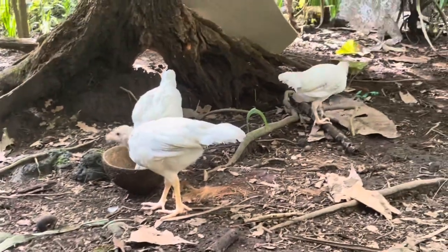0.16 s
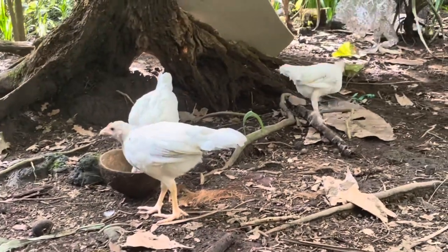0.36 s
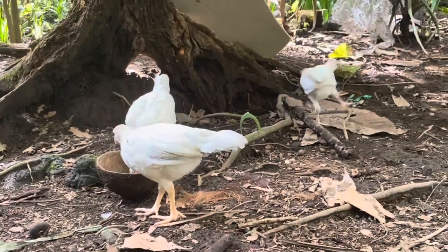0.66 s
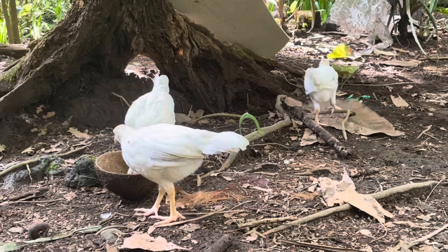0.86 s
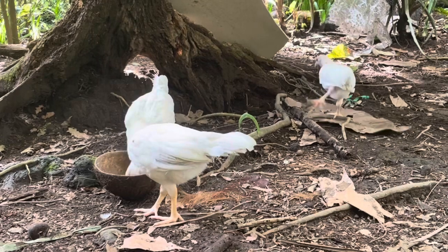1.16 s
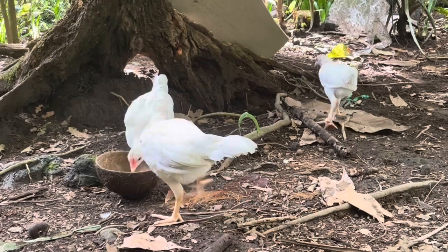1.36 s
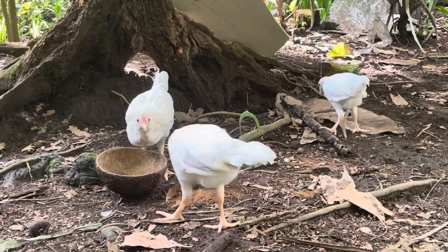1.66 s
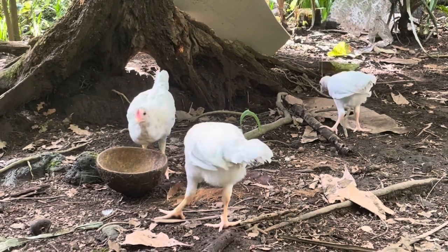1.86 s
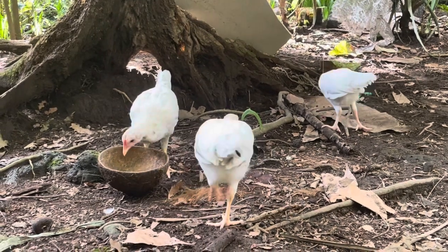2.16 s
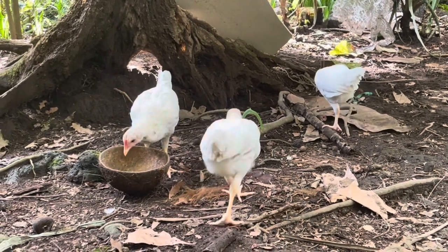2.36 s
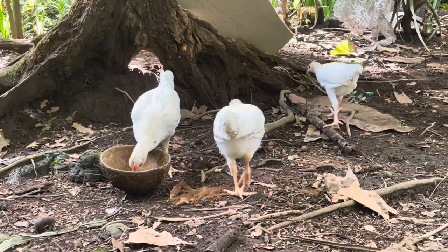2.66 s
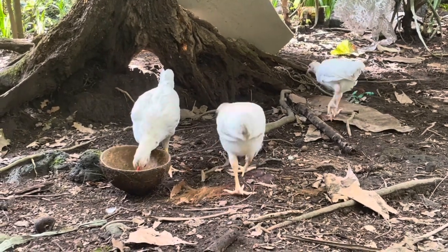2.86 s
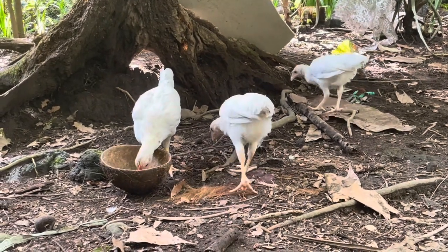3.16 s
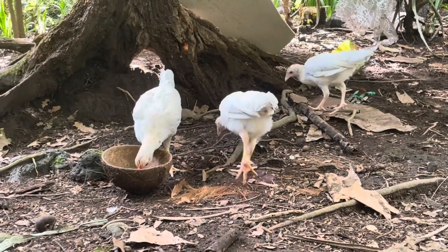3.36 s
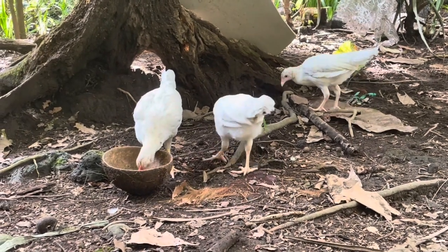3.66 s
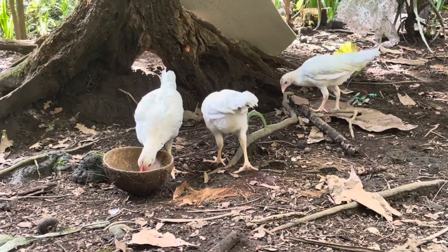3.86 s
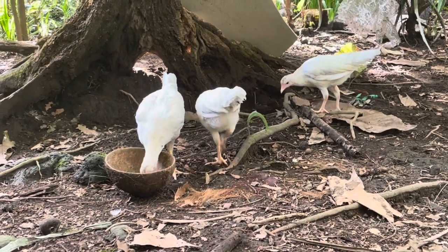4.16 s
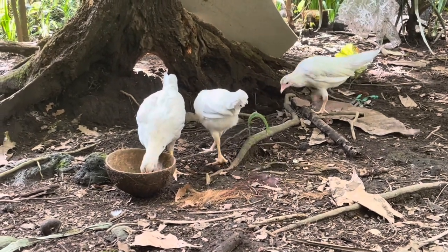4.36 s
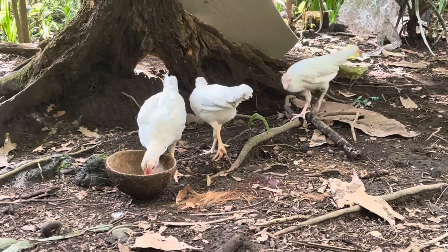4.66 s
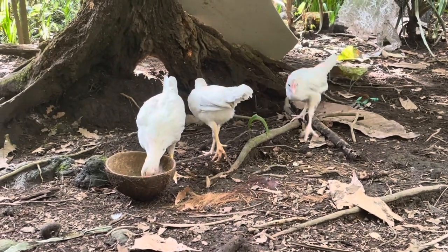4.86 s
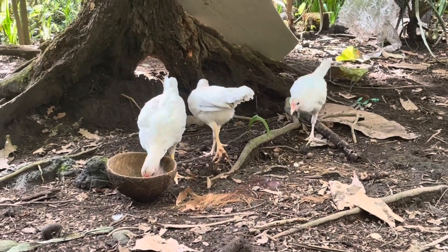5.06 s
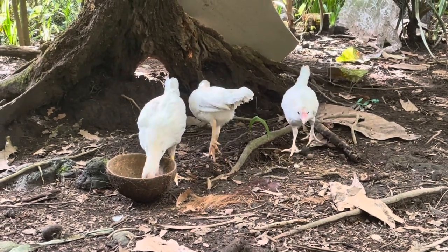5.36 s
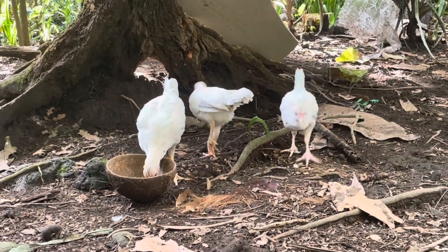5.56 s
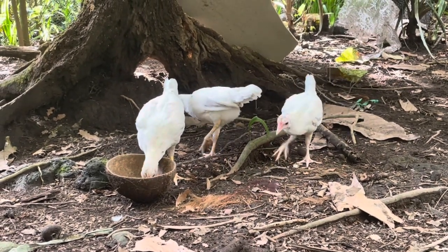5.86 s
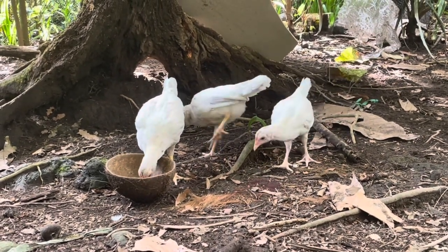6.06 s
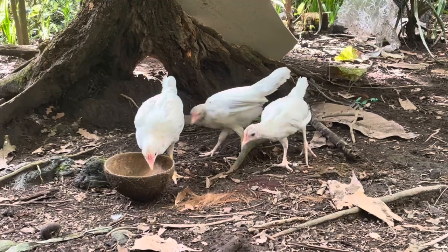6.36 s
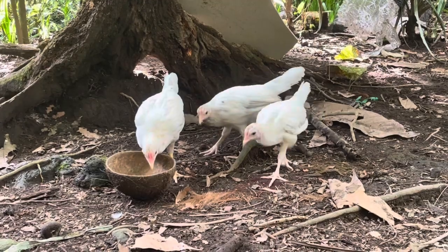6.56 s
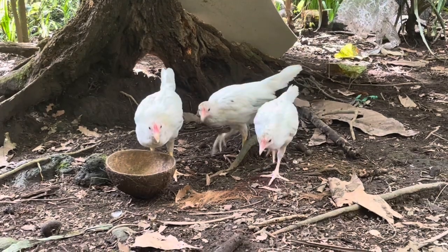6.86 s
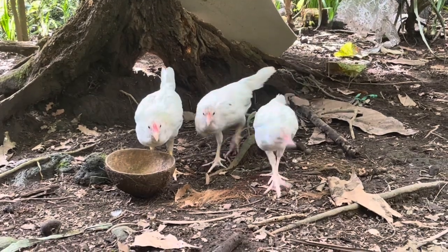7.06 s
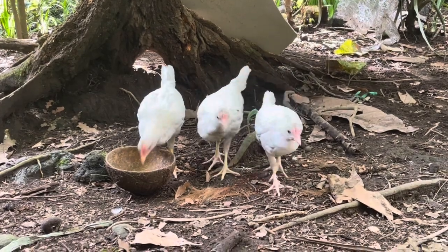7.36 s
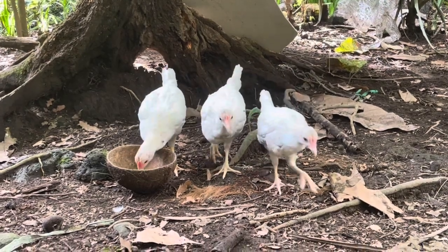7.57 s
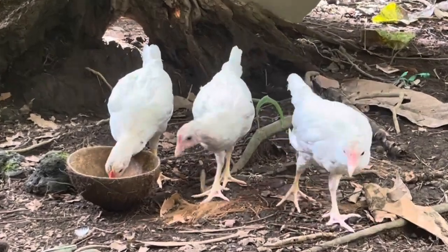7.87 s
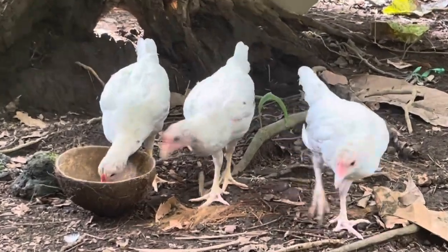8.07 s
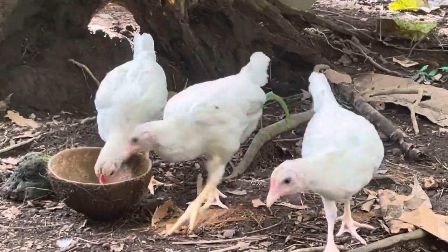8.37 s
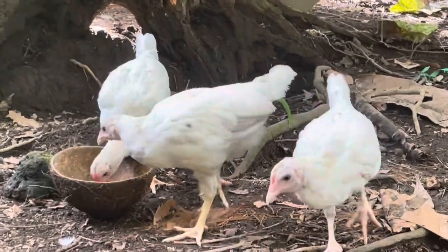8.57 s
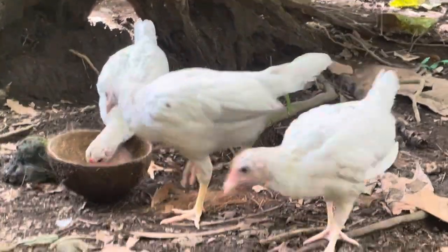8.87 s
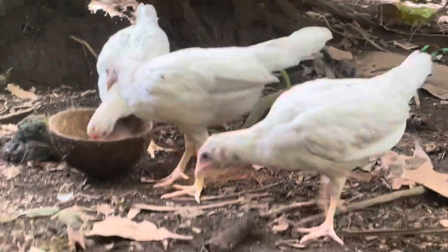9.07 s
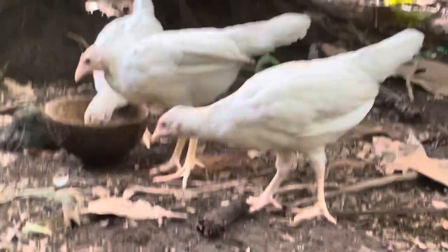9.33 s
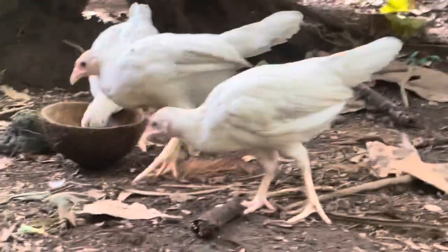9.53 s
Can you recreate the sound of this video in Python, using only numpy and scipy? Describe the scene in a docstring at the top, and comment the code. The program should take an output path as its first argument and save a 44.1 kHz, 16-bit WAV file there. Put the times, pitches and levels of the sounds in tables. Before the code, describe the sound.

A nearby stereo microphone in a leafy yard picks up busy leaf rustling and a sharp bowl knock at first, then sparser scratching, a loud crackle at seven seconds and a cluster of bowl pecks near nine. Behind these, a dog barks with slight echo, roosters crow hoarsely three times, a bird whistles, a young fowl peeps briefly, and a low hum and breeze rumble underneath.

```python
"""A breeze rumbles on the microphone and a motor hums as a far dog barks in steady runs of rough pulses.
Young fowl scratch dry leaves, heard as crackling noise bursts, and peck a hollow bowl, heard as short rings.
A small bird whistles and trills in gliding tones. Roosters further off give hoarse, drawn-out crows,
built from partials that waver and break up; a young bird adds a few short peeps."""
import sys
import numpy as np
from scipy import signal
from scipy.fft import rfft, irfft, next_fast_len
from scipy.io import wavfile
from scipy.ndimage import uniform_filter1d

SR = 44100
rng = np.random.default_rng(int(sys.argv[2]) if len(sys.argv) > 2 else 0)


def transcribe(signal):
    """Save signal, clipped to [-1, 1], as a 16-bit WAV file at the path in sys.argv[1]."""
    frames = np.atleast_2d(signal).T
    limited = np.clip(frames, -1, 1)
    pcm = np.round(limited * 32767).astype(np.int16)
    wavfile.write(sys.argv[1], SR, pcm)


def decibels_to_gain(level_db):
    """Convert a level in decibels to a linear amplitude gain (20 dB per decade)."""
    exponent = np.asarray(level_db, float) / 20
    return 10 ** exponent


N = 427769
T = np.arange(N) / SR   # time axis (s)


def rms_one(x):
    """Scales a signal to an rms of 1."""
    return x / np.sqrt(np.mean(x ** 2) + 1e-20)


def coloured(x, points):
    """Equalises a sound through (hz, gain_db) points, joined over log frequency."""
    size = next_fast_len(x.shape[-1])
    hz, gain_db = np.transpose(points)
    log_hz = np.log(np.fft.rfftfreq(size, 1 / SR) + 1)
    gain = decibels_to_gain(np.interp(log_hz, np.log(hz), gain_db))
    return irfft(rfft(x, size) * gain, size)[..., :x.shape[-1]]


def wobble(rate_hz, size):
    """Smooth chance with nothing much faster than its rate, spread 1."""
    lowpass = signal.butter(3, rate_hz, fs=SR, output="sos")
    settled = signal.sosfilt(lowpass, rng.standard_normal(size + SR))[SR:]
    return rms_one(settled)


def bump(s, half_s):
    """A smooth swell, 1 on top."""
    return np.exp(-((T - s) / half_s) ** 2)


def resonate(x, hz, width_hz):
    """Two-pole resonance, gain 1 on top."""
    r = np.exp(-np.pi * width_hz / SR)
    feedback = [1, -2 * r * np.cos(2 * np.pi * hz / SR), r * r]
    return signal.lfilter([(1 - r * r) / 2, 0, (r * r - 1) / 2], feedback, x)


def partial(phase, db, hoarse, flutter_hz):
    """A tone whose hoarse share wanders in strength and phase, so that it breaks into short bursts."""
    hoarse = np.clip(hoarse, 0, 1)
    wander = (wobble(flutter_hz, phase.size) + 1j * wobble(flutter_hz, phase.size)) / np.sqrt(2)
    motion = np.sqrt(1 - hoarse) + np.sqrt(hoarse) * wander
    return np.sqrt(2) * decibels_to_gain(db) * np.real(motion * np.exp(1j * phase))


def unroll(rows, fade_s=0.01):
    """Where a call lies, its columns sample by sample, and its soft ends."""
    s, *columns = np.transpose(rows)
    span = slice(int(s[0] * SR), int(s[-1] * SR))
    t = T[span]
    ends = np.clip(np.minimum(t - s[0], s[-1] - t) / fade_s, 0, 1)
    return span, [np.interp(t, s, column) for column in columns], ends


def echoes(x, t60_s, onset_s, alike):
    """Walls and trees return a dying wash, partly different on each side."""
    t = T[:SR]
    noise = rng.standard_normal((3, t.size))
    decay = decibels_to_gain(-60 * t / t60_s) * (1 - np.exp(-t / onset_s))
    wash = (alike * noise[0] + noise[1:]) * decay
    return signal.fftconvolve(x[None], wash, axes=1)[:, :x.size]


def wide_noise(points):
    """Coloured noise of rms 1, independent in mid and side."""
    return rms_one(coloured(rng.standard_normal((2, N)), points))


def gust_swells():
    """Each gust swells and sinks as a smooth bump."""
    # gusts: top_s (when the swell peaks), level_db, half_width_s
    gust_rows = [(1.84, -53, 0.031), (3.76, -51, 0.079), (7.92, -55, 0.06), (8.24, -43, 0.021),
                 (9.05, -41.5, 0.15), (9.54, -40.5, 0.15)]
    return sum(decibels_to_gain(db) * bump(top_s, half_s) for top_s, db, half_s in gust_rows)


def breeze(gusts):
    """Lumpy low wind noise on the microphone, blown up by the gusts."""
    # wind colour: hz, gain_db
    wind_colour = [(22, -54), (32, -11), (42, -13.5), (55, 9.5), (75, 7), (92, 8.5), (110, -31),
                   (200, -110)]
    blow = decibels_to_gain(-52.5 + 2 * wobble(6.8, N)) + gusts
    wind = wide_noise(wind_colour)
    # evened out, so that the blow and not chance sets the swell
    wind /= np.sqrt(uniform_filter1d(wind ** 2, size=SR // 8) + 0.25)
    return blow * wind


def drone(gusts):
    """Far traffic as low noise that swells once; the gusts add noise of the same colour."""
    # drone colour: hz, gain_db
    drone_colour = [(70, -20.5), (100, -2), (140, -1.5), (175, -2.5), (200, -13.5), (276, -14.5),
                    (450, -24.5), (900, -100)]
    drone_db = -57.5 + 4.3 * bump(7.77, half_s=0.86)
    return decibels_to_gain(-16.5) * gusts * wide_noise(drone_colour) + decibels_to_gain(drone_db) * wide_noise(drone_colour)


def yard_murmur():
    """The murmur of the yard, noise with a slightly unsteady level."""
    # murmur colour: hz, gain_db
    yard_colour = [(180, -20), (300, -12), (407, -7), (599, 2.5), (1030, -3), (1430, -6), (2200, -7.5),
                   (3500, -18), (7000, -77)]
    return decibels_to_gain(-68.5 + 0.86 * wobble(22.0, N)) * wide_noise(yard_colour)


def motor_hum():
    """A steady low tone and its wavering octave, each with its own slow level."""
    # motor: time_s, hum_db, octave_db
    hum_levels = [(0, -60.5, -64.5), (.7, -71, -64.5), (2.7, -67, -68.5), (3.3, -53.5, -100),
                  (4.2, -48, -69), (6.8, -53, -67), (7.7, -47.5, -87), (9.5, -50.5, -62), (9.7, -67, -83)]
    s, hum_db, octave_db = np.transpose(hum_levels)
    phase = 2 * np.pi * 104 * T   # 104 Hz
    hum = partial(phase, np.interp(T, s, hum_db), 0.063, flutter_hz=4.55)
    return hum + partial(2 * phase, np.interp(T, s, octave_db), 0.99, flutter_hz=12.1)


def air():
    """Breeze, drone and murmur spread over the stereo width, the hum in the centre."""
    # width of the air: hz, side_gain_db
    air_width = [(40, -48), (150, -24.5), (380, -17), (950, -17), (2380, -10.5)]
    gusts = gust_swells()
    mid, side = breeze(gusts) + drone(gusts) + yard_murmur()
    mid = mid + motor_hum()
    side = coloured(side, air_width)
    return np.array([mid + side, mid - side])


def litter():
    """Dry leaves stir as a flickering hiss with tiny crackles, more of them as the stirring grows."""
    # stirring: time_s, hiss_db
    stirring = [(0, -70.5), (.6, -64.5), (.75, -71), (1.1, -63), (2.0, -72.5), (6.1, -73.5), (6.28, -65.5),
                (6.5, -75), (7.1, -71.5), (8.9, -68.5), (9.3, -72), (9.7, -70)]
    # hiss colour: hz, gain_db
    hiss_colour = [(1500, -0.5), (3000, 1.5), (5000, -1.5), (6900, -5), (9000, -10), (10700, 2),
                   (13000, -16), (14500, -3.5), (16000, -9)]
    s, db = np.transpose(stirring)
    draw = rng.random((2, N))
    activity_db = 5 * wobble(4, N) + np.interp(T, s, db - np.median(db))
    falls = draw[0] < 25 * decibels_to_gain(activity_db) / SR   # 25 a second at 0 dB activity
    crackles = falls * 9 * np.minimum((1 - draw[1]) ** -.5, 2.5)
    hiss = rms_one(coloured(rng.standard_normal(N) + crackles, hiss_colour))
    return decibels_to_gain(np.interp(T, s, db) + 1.4 * wobble(25.0, N)) * hiss


def barks():
    """Rough pulses on an arched pitch pass a throat shaped anew each time; walls and trees add a wash."""
    # barks: start_s, level_db, chest_db, top_db (balance of the low and high resonances)
    bark_rows = [(-0.06, -61, -2, -4), (1.025, -61, 0.5, 3), (1.53, -56.5, -3.5, -3),
                 (2.53, -58.5, -2.5, -3), (2.965, -58, -3, 0.5), (3.435, -60, -3, -1),
                 (3.908, -59, -4.5, -4), (4.357, -57, -6.5, -4.5), (5.47, -68, -9, -1),
                 (5.66, -59.5, -3.5, 0), (6.11, -55.5, -4.5, -6), (6.59, -64, -1, -9),
                 (7.07, -57.5, -4.5, -1.5), (9.3, -62.5, -2, -0.5), (9.65, -66, 7.5, -11)]
    # throat resonances before each bark's shaping: hz, width_hz, gain_db
    throat = [(517, 81, -1.5), (704, 84, 12), (1155, 235, 5), (1550, 140, -23), (1891, 150, 3),
              (3020, 370, -16)]
    lead = SR // 10   # room for the bark already under way at the start
    voice, t = np.zeros(N + lead), T[:int(.145 * SR)]
    arch = np.sin(np.pi * t / t[-1])
    for s, db, chest_db, top_db in bark_rows:
        centre_hz = 533 * (1 + .015 * rng.standard_normal())
        hz = centre_hz * (.85 + .2 * arch) * (1 + .04 * wobble(150, t.size))
        phase = np.cumsum(hz) / SR
        pulses = rms_one(np.diff(phase % 1, prepend=0)) + 1.17 * rng.standard_normal(t.size)
        pulses = np.pad(decibels_to_gain(db) * arch ** .4 * pulses, (0, lead))
        # as the jaw drops, all resonances but the second swell in
        opens = np.clip(T[:pulses.size] / 0.033, 0, 1) ** 2
        chest, top = decibels_to_gain(chest_db), opens * decibels_to_gain(top_db)
        parts = [opens * chest, chest, opens, opens, top, top]
        shape = rng.standard_normal((len(throat), 2)) * [.025, 2]   # shift as a share, gain in dB
        bark = np.zeros(pulses.size)
        for k, ((hz, width_hz, gain_db), (shift, more_db)) in enumerate(zip(throat, shape)):
            ring_hz = hz * (1 + shift)
            ring = resonate(resonate(parts[k] * pulses, ring_hz, width_hz), ring_hz, 2 * width_hz)
            bark += decibels_to_gain(gain_db + more_db) * (-1) ** k * ring
        at = int(s * SR) + lead
        voice[at:][:bark.size] += bark[:voice.size - at]
    wash = echoes(voice, t60_s=0.92, onset_s=0.0048, alike=3.6)
    return (decibels_to_gain(14.5) * voice + decibels_to_gain(-32.5) * wash)[:, lead:]


def rustles():
    """Feet and beaks in dry leaves: a snap, then a clump of crackles with its own tonal balance."""
    # rustles: start_s, level_db, decay_s (time to fall 30 dB), low_db, top_db
    rustle_rows = [(0.037, -45.5, 0.16, -8, -5), (0.168, -42, 0.059, 8.5, -4), (0.274, -31, 0.014, -4, -25),
                   (0.514, -38.5, 0.057, 6, -13), (0.578, -42, 0.28, -26, -12),
                   (0.816, -36.5, 0.088, -3, -9), (0.841, -40.5, .1, 3.5, -12),
                   (1.008, -51, 0.045, 18.5, 12.5), (1.116, -40, 0.071, 7, 2),
                   (1.1393, -44, 0.071, 16.5, -18), (1.287, -47, 0.078, 13.5, -8),
                   (1.306, -28, 0.063, 3, -7), (1.328, -32, 0.037, 1, -10), (1.38, -42.5, 0.089, -15, -4),
                   (1.457, -46, 0.14, 12.5, -0.5), (1.576, -48.5, 0.07, 21, -10),
                   (1.649, -41.5, 0.081, 15, 0), (2.18, -43, 0.043, 2, -14), (2.576, -57.5, 0.06, -9, 11),
                   (3.092, -45.5, 0.15, 6, -27), (3.633, -48, 0.089, 16, -13), (4.317, -41.5, 0.098, 3, -6),
                   (4.89, -51.5, 0.29, -27, -7), (6.168, -41, 0.02, -6, 0.5), (6.225, -34, 0.056, -11, 1.5),
                   (6.647, -44, 0.21, 9, -19), (7.003, -25, 0.063, -3, -10), (7.015, -42, 0.037, -7, 4),
                   (6.557, -47.5, .03, -3, -11), (9.31, -49, .03, 11, -8), (8.848, -39.5, 0.041, -6, -16),
                   (9.2645, -59.5, 0.11, 21, 15)]
    out, t = np.zeros(N), T[:int(.15 * SR)]
    for s, db, decay_s, low_db, top_db in rustle_rows:
        draw = rng.random((3, t.size))
        heights = np.minimum((1 - draw[2]) ** -.4, 3.0)
        grains = (draw[0] < 3500 / SR) * np.sign(draw[1] - .5) * heights   # 3500 a second
        burst = (0.16 * grains + 0.31 * (draw[1] - .5)) * decibels_to_gain(-30 * t / np.clip(decay_s, .003, .3))
        burst *= 1 - np.exp(-t / 0.0026)
        burst *= decibels_to_gain(1.5 * wobble(120, t.size))
        burst[0] += 0.3   # the snap
        low = decibels_to_gain(low_db) * resonate(burst, 850, 1560)
        middle = resonate(burst, 3200, 2830)
        top = decibels_to_gain(top_db) * resonate(burst, 10300, 6000)
        at = int(s * SR)
        out[at:][:t.size] += (2.66 * decibels_to_gain(db) * (low + middle + top))[:N - at]
    return out


def knocks():
    """Beaks tap a hollow bowl: its shell rings for a few cycles, a little off pitch, under a dull tick."""
    # taps: start_s, level_db, place (0 belly to 1 rim)
    taps = [(.411, -43.5, 0.097), (.516, -51, 0.2), (1.01, -53, 0.1), (1.143, -28, 0.97), (1.147, -39, .99),
            (4.327, -41, 0.89), (8.783, -38.5, 0.32), (8.864, -44, 0.42), (8.909, -36.5, 0.03),
            (8.944, -45, 0.03), (8.963, -34, 0.05), (8.981, -34.5, 0.27), (9.24, -43, 0.05),
            (9.415, -41, 0.66)]
    # shell modes before detuning: hz, belly_db, rim_db, t60_s
    bowl_modes = [(800, 0.5, -43, 0.029), (1230, -14, -23, 0.018), (1550, -30, -1.5, 0.0064),
                  (2490, -39, 3, 0.0016)]
    out, t = np.zeros(N), T[:int(.04 * SR)]
    for s, db, place in taps:
        detune = 1 + 0.03 * rng.standard_normal()
        shell = np.zeros(t.size)
        for hz, belly_db, rim_db, t60_s in bowl_modes:
            level = decibels_to_gain(belly_db) + (decibels_to_gain(rim_db) - decibels_to_gain(belly_db)) * np.clip(place, 0, 1)
            shell += level * decibels_to_gain(-60 * t / t60_s) * np.sin(2 * np.pi * hz * detune * t)
        tick = resonate(rng.standard_normal(t.size) * decibels_to_gain(-60 * t / 0.0017), 1600, 1500)
        out[int(s * SR):][:t.size] += decibels_to_gain(db) * (shell + 1.2 * tick)
    return out


def gliding_tones(calls, hoarse, flutter_hz):
    """Sings one tone for each call, a list of (time_s, pitch_hz, level_db) points."""
    out = np.zeros(N)
    for rows in calls:
        span, (hz, db), ends = unroll(rows, fade_s=0.0051)
        out[span] += ends * partial(2 * np.pi * np.cumsum(hz) / SR, db, hoarse, flutter_hz)
    return out


def notes(rows):
    """Each note swells in, glides evenly and fades."""
    swell, fade_db = 0.43, 6.5   # swell as a share of the length
    calls = []
    for s, length_s, first_hz, last_hz, db in rows:
        top_hz = first_hz + (last_hz - first_hz) * swell
        calls.append([(s, first_hz, db - 3.0), (s + swell * length_s, top_hz, db),
                      (s + length_s, last_hz, db - fade_db)])
    return calls


def flutters():
    """The small bird's trills: tones that break up fast."""
    # trills: start_s, length_s, first_hz, last_hz, level_db
    trills = [(.72, 0.094, 5320, 5400, -76), (2.97, 0.132, 5330, 5180, -78.5)]
    return gliding_tones(notes(trills), hoarse=1, flutter_hz=170)


def whistles():
    """The small bird's whistle: a quick slide up, then a nearly held top that dies away."""
    # whistles: start_s, length_s, level_db, top_hz
    whistle_rows = [(0.91, 0.115, -64.5, 5260), (1.75, 0.14, -76, 5070), (3.132, 0.24, -65.5, 5110),
                    (5.703, .17, -69.5, 5250)]
    rise_s, swell_db, fade_db = 0.065, 14, 20
    calls = [[(s, .8 * hz, db - swell_db), (s + rise_s, hz, db), (s + length_s, .987 * hz, db - fade_db)]
             for s, length_s, db, hz in whistle_rows]
    return gliding_tones(calls, hoarse=0.65, flutter_hz=90)


def far_notes():
    """Faint far notes: single unsteady tones."""
    # notes: start_s, length_s, first_hz, last_hz, level_db
    faint_rows = [(1.46, 0.16, 1690, 1680, -61), (1.62, 0.25, 2870, 2820, -69.5),
                  (2.73, 0.24, 2835, 2817, -76), (2.79, 0.27, 4050, 3890, -84),
                  (3.24, 0.22, 1754, 1665, -73), (5.02, 0.32, 1172, 1240, -69),
                  (7.578, 0.038, 670, 700, -61.5), (3.49, 0.21, 1645, 1646, -71),
                  (7.52, 0.18, 6660, 7100, -76)]
    return gliding_tones(notes(faint_rows), hoarse=0.61, flutter_hz=46.0)


def crows():
    """Effort lifts all partials; throat ring feeds the second and drains those above; rasp breaks up the
    high ones most, a growl sets tones between them and breath fills the gaps."""
    # voice, one list per crow: time_s, pitch_hz, hoarseness (0-1), rasp (0-1)
    crow_voices = [
        [(1.6, 770, .95, .5), (1.76, 800, .95, .6), (1.85, 890, .95, .6), (2.05, 915, .95, .4),
         (2.3, 922, .8, .2), (2.47, 905, .95, .5), (2.57, 835, .95, .6), (2.7, 780, .9, .5), (2.95, 680, 1, .7)],
        [(5.3, 825, .8, .15), (5.58, 840, .9, .2), (5.73, 885, .9, .25), (6.0, 855, .6, .06),
         (6.2, 830, .7, .1), (6.49, 815, .7, .1), (6.52, 823, .06, 0), (6.8, 818, .08, 0), (6.98, 808, .2, 0),
         (7.05, 803, .6, .05), (7.3, 795, .9, .2)],
        [(7.63, 945, .9, .3), (7.69, 985, .9, .6), (7.88, 960, .95, .5), (7.94, 1025, .95, .45),
         (8.1, 995, .9, .3), (8.25, 980, .85, .3), (8.42, 955, .95, .75), (8.53, 945, .85, .5),
         (8.63, 948, .6, .04), (8.8, 940, .55, .01), (9.0, 875, .85, .1), (9.3, 860, 1, .3)],
    ]
    # effort, one list per crow: time_s, fundamental_db, ring_db on the 2nd partial
    crow_efforts = [
        [(1.6, -58, -3), (1.86, -54.5, -0.5), (2.33, -50.5, 1), (2.74, -62.5, 3), (2.95, -63.5, -5)],
        [(5.3, -60, 0), (5.38, -59.5, -1), (5.47, -53.5, -5.5), (5.8, -58.5, 7), (6.05, -58, -0.5),
         (6.3, -69, 13.5), (6.49, -72.5, 13), (6.53, -70, 22), (6.75, -64.5, 17), (6.98, -64, 10),
         (7.14, -66, 9.5), (7.3, -74, 4)],
        [(7.63, -81, 5), (7.66, -54.5, 2), (7.72, -51, -1.5), (7.88, -58.5, -2), (7.95, -52.5, 6),
         (8.12, -52.5, 9.5), (8.35, -49, 9.5), (8.44, -54.5, 15.5), (8.485, -54.5, 7), (8.52, -53.5, 16.5),
         (8.66, -56, 17), (8.76, -55.5, 13), (8.98, -57, 14.5), (9.1, -64, 7), (9.3, -73.5, 6.5)],
    ]
    # strain, one list per crow: time_s, bite_db on the 3rd and higher partials, growl_depth (0-1)
    crow_strains = [
        [(1.6, 9, 0.1), (1.9, -3, 0.02), (2.25, 5, 0), (2.5, -5, 0.19), (2.95, -6, 0.27)],
        [(5.3, -5.5, 0.05), (5.8, 7.5, 0), (6.2, 0, 0.2), (6.5, 12, 0.11), (6.9, 0, 0.01), (7.3, 7, 0.35)],
        [(7.63, 4, 0), (7.8, 4, 0.2), (7.92, 0, 0.17), (8.15, 2, 0), (8.3, 3.5, 0.07), (8.45, 7, 0.03),
         (8.62, 6.5, 0), (8.85, 7.5, 0), (9.0, 7, 0), (9.3, -7, 0.15)],
    ]
    # air forced past the voice, one list per crow: time_s, level_db
    crow_breaths = [
        [(1.6, -69), (1.9, -62), (2.45, -59), (2.95, -68)],
        [(5.3, -65), (5.55, -61), (5.8, -71), (6.5, -62), (7.3, -81)],
        [(7.63, -70), (7.78, -56), (7.88, -65), (8.0, -59), (8.2, -63), (8.42, -54.5), (8.56, -55),
         (8.72, -69.5), (9.3, -79)],
    ]
    # breath colour: hz, gain_db
    breath_colour = [(600, -15), (1200, 5.5), (1600, 9), (2300, 3.5), (2900, -6.5), (3600, -12),
                     (4500, -10.5), (5500, -8), (7000, -22)]
    # 3rd and higher partials against the fundamental before bite and ring, one row per crow: level_db
    overtones = [
        [-17.5, -20.5, -21, -33, -23, -45, -33, -30, -34],
        [-19.5, -12, -48, -40, -25, -31],
        [-7, -11.5, -16.5, -14.5, -26, -35, -27, -26, -36, -36, -36, -32],
    ]
    # loss of the 3rd, 4th and higher partials per dB of ring: drain (dB per dB)
    ring_drains = [0.87, 0.65, 0.033]
    # growl rate, one per crow: share of the pitch
    growl_shares = [.5, .5, .3]
    # mouth and beak colour the high partials: hz, gain_db
    beak_colour = [(3300, 0), (3800, -5.5), (4300, 9), (4700, -4.5), (5200, 2.5), (5700, -6.5), (6100, -6),
                   (6900, 1), (7500, -4.5)]
    # stereo place, one per crow: left_minus_right_db
    crow_pans = [0.4, 0.5, 2]
    out = np.zeros((2, N))
    for voice, effort, strain, breath, overtones_db, share, pan_db in zip(
            crow_voices, crow_efforts, crow_strains, crow_breaths, overtones, growl_shares, crow_pans):
        span, (effort_db, ring_db), ends = unroll(effort)
        _, (hz, hoarse, rasp), _ = unroll(voice)
        _, (bite_db, growl_depth), _ = unroll(strain)
        _, (breath_db,), _ = unroll(breath)
        size = hz.size
        pan = decibels_to_gain([[pan_db / 2], [-pan_db / 2]])

        phase = 2 * np.pi * np.cumsum(hz * (1 + .007 * hoarse * wobble(14, size))) / SR
        effort_db = effort_db + 1.2 * hoarse * wobble(12, size)
        growl = 1 + np.clip(growl_depth, 0, 1) * partial(share * phase, 0, .8, flutter_hz=40)
        gasp = decibels_to_gain(breath_db + 1.96 * wobble(23, size))
        out[:, span] += ends * gasp * rms_one(coloured(rng.standard_normal(size), breath_colour)) * pan

        drains = np.pad(ring_drains, (0, len(overtones_db)), "edge")
        levels = [effort_db, effort_db + ring_db]
        levels += [effort_db + bite_db + db - drain * ring_db for db, drain in zip(overtones_db, drains)]
        for k, db in enumerate(levels, 1):
            db = db + np.interp(k * hz, *np.transpose(beak_colour)) + (k > 2) * 2.2 * wobble(5, size)
            broken = np.clip(rasp * (.3 + .17 * k), 0, .9)
            tone = np.sqrt(1 - broken) * partial(k * phase, db, hoarse, flutter_hz=19 + 10 * k)
            tone += np.sqrt(broken) * partial(k * phase, db, 1, flutter_hz=100 + 35 * k)
            # the low tone spreads round and arrives centred
            out[:, span] += ends * growl * tone * pan ** (k > 1)
    return out + decibels_to_gain(-41.5) * echoes(out.mean(0), t60_s=.45, onset_s=.01, alike=0)


def peeps():
    """A young bird's short gliding notes of three partials."""
    # peeps: start_s, length_s, first_hz, last_hz, level_db, second_db, third_db
    peep_rows = [(5.234, 0.041, 1440, 1326, -50.5, -60, -65), (7.436, 0.02, 1160, 1210, -68, -49.5, -60),
                 (7.444, 0.037, 1550, 1080, -50, -50.5, -60.5)]
    out = np.zeros(N)
    for s, length_s, first_hz, last_hz, *levels in peep_rows:
        u = np.linspace(0, 1, int(length_s * SR))
        phase = 2 * np.pi * np.cumsum(first_hz + (last_hz - first_hz) * u) / SR
        voice = sum(partial(k * phase, db, 0.41, flutter_hz=80) for k, db in enumerate(levels, 1))
        out[int(s * SR):][:u.size] += np.sin(np.pi * u) * voice
    return out


def scene():
    """All sources together; trills, whistles and far notes are blurred by echoes among the trees."""
    near = litter() + rustles() + knocks() + peeps()
    far = flutters() + whistles() + far_notes()
    far_wash = decibels_to_gain(-36.0) * echoes(far, t60_s=0.58, onset_s=0.0082, alike=1.86)
    return air() + barks() + near + 1.8 * far + far_wash + crows()


def roll_off(x):
    """The treble ends steeply here."""
    return signal.sosfilt(signal.butter(12, 15730, fs=SR, output="sos"), x)


def record(dry):
    """The scene's width survives below 2.5 kHz; above, the phase between two microphone ports sets it."""
    # the ports fall out of phase near 8 and 14 kHz; what they share: hz, gain_db
    in_phase = [(7300, 1), (7700, -7.5), (8200, -24), (8750, -10), (9300, -2.5), (13300, -3), (14100, -15),
                (15700, -21)]
    # what they oppose: hz, gain_db
    opposed = [(2500, -17), (5800, -33.5), (6500, -6), (7500, 1.5), (9000, 2), (10200, -5), (11000, -20),
               (12600, -25), (13300, 1), (14500, -6), (15700, -20)]
    mid, side = (dry[0] + dry[1]) / 2, (dry[0] - dry[1]) / 2
    quarter_turned = np.imag(signal.hilbert(mid, next_fast_len(N)))[:N]
    side = coloured(side, [(2000, 11.0), (2700, -22.0)]) + coloured(quarter_turned, opposed)
    mid = coloured(mid, in_phase)
    return roll_off(np.array([mid + side, mid - side]))


dry = scene()
out = record(dry)
transcribe(out)
```